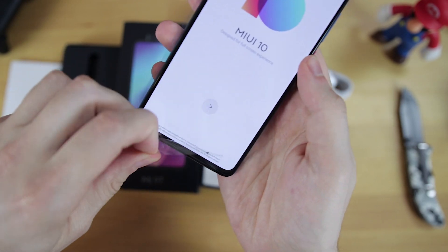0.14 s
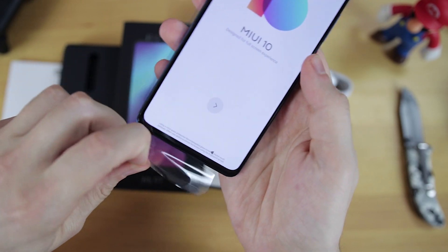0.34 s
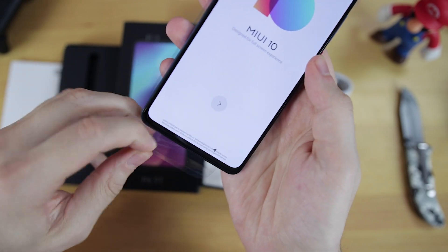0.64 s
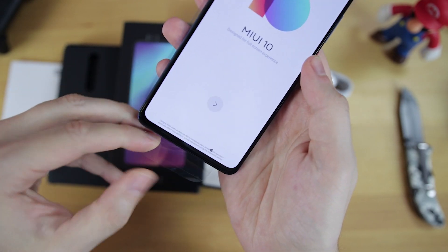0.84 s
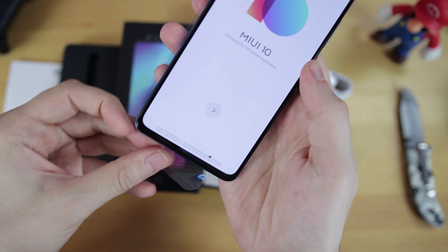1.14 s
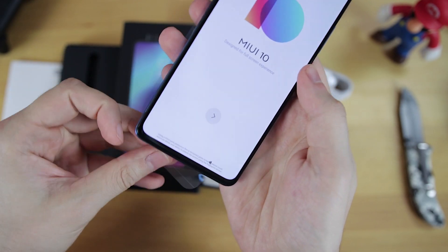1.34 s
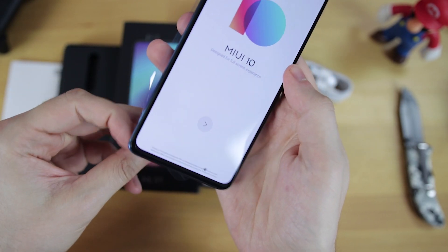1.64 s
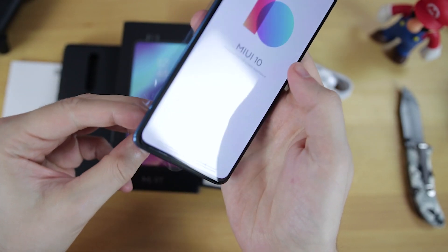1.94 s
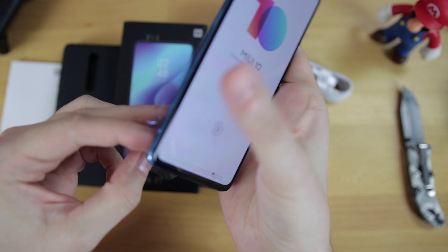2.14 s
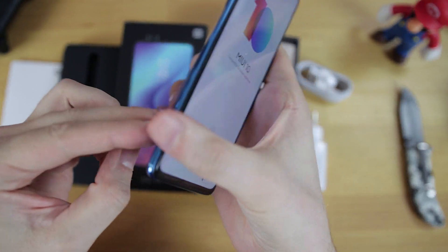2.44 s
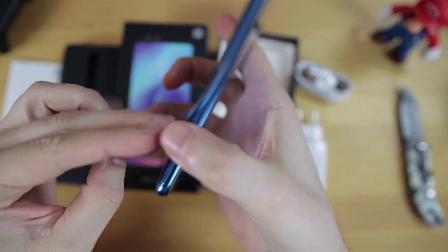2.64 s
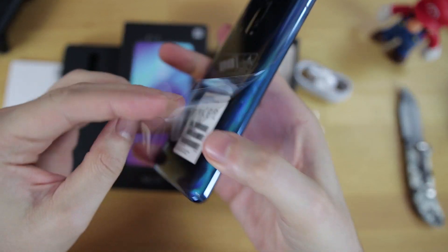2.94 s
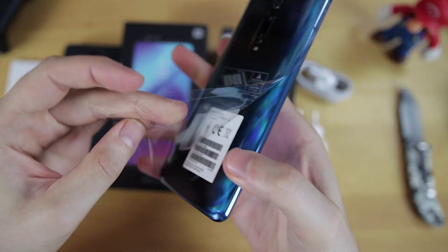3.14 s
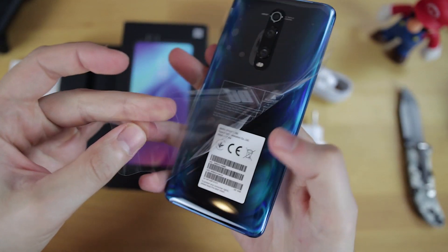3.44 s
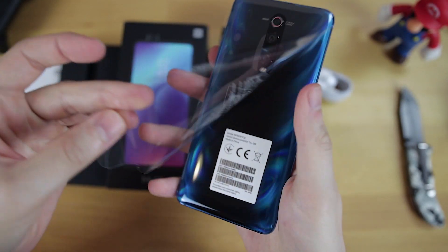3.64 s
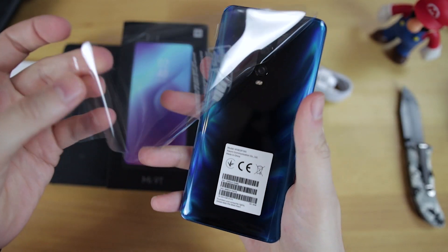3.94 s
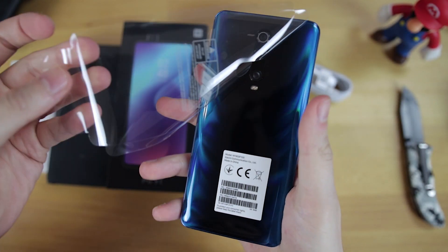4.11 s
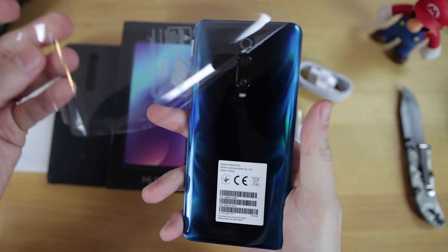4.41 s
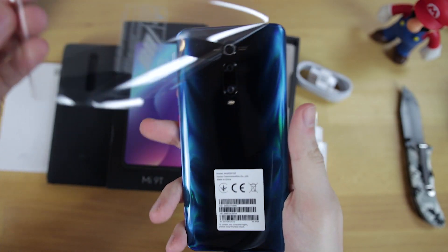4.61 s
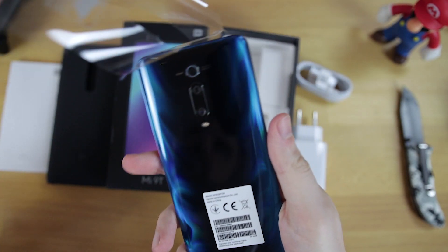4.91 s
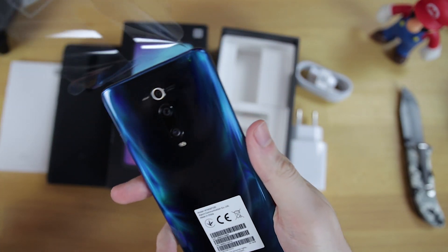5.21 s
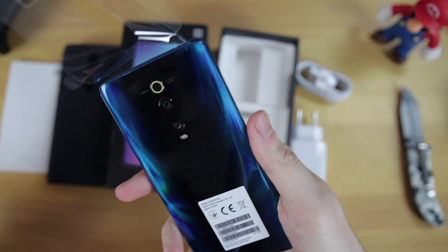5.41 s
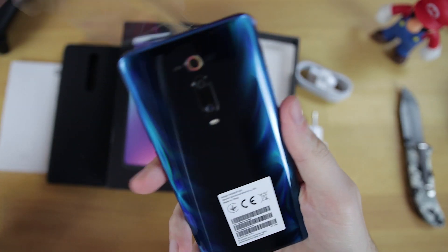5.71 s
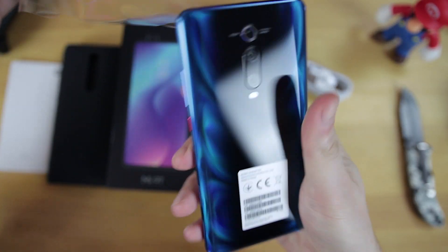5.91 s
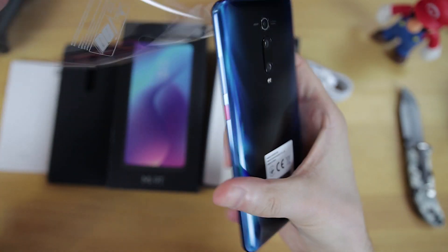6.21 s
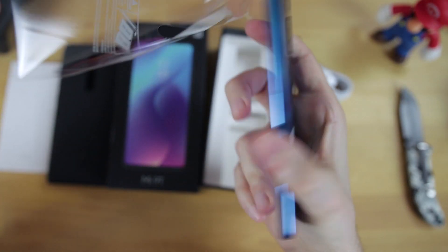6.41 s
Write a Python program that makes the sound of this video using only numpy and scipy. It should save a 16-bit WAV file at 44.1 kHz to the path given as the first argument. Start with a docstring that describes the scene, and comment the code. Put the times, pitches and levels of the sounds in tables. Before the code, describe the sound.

Thin stiff plastic film snaps, ticks and crackles as it is peeled off a phone by hand, close up in a small quiet room.

```python
"""Plastic protective film is peeled off a phone held above a desk in a small room.
Hum, air noise and the faint fizz and ticks of taut film run from the start. From 0.2 s the film snaps as it
buckles, skin rubs the phone and flipped panels ring; from 0.7 s pulls swell the fizz and thicken the ticks.
Finger taps start at 1.4 s, dull bumps at 2.2 s, slides of film on glass at 2.9 s; 5.5-5.9 s is densest in snaps.
Noise bursts, sines and shaped noise make the sources; one wall echo and a room tail follow film and hands."""
import sys
import numpy as np
from scipy import signal
from scipy.fft import rfft, irfft
from scipy.io import wavfile
from scipy.ndimage import uniform_filter1d

SR = 44100
rng = np.random.default_rng(int(sys.argv[2]) if len(sys.argv) > 2 else 0)


def put_to_file(sound):
    """Save the sound as 16-bit audio at rate SR, in the file named by the first command-line argument."""
    columns = np.atleast_2d(sound).T  # one column per channel
    safe = np.clip(columns, -1, 1)
    whole_steps = np.round(safe * 32767)
    wavfile.write(sys.argv[1], SR, whole_steps.astype(np.int16))


N = 289296
TIME_S = np.arange(N) / SR

# room noise: (frequency [Hz], relative level per Hz [dB])
AIR_COLOUR = [(15, -27), (25, -16), (86, -12.5), (122, -8), (148, -12), (169, -14.5), (305, -2.5),
              (340, -7), (457, -10), (552, -13), (598, -10), (848, -14), (919, -19), (3830, -34),
              (15500, -29)]
AIR_RMS_DB = -61.5
# hum partials: (frequency [Hz], rms before the swell [dB])
HUM_PARTIALS = [(59.7, -77), (119.5, -68.5), (179, -71)]
# hum gain: (time [s], gain [dB])
HUM_SWELL = [(0, -3), (4.5, -4.5), (5, -2), (6.56, 3)]

# pulls lifting film off the glass: (start [s], length [s], fizz gain [dB])
PULLS = [(.69, 0.032, -54), (1.74, 0.083, -60.5), (2.27, 0.043, -47), (2.62, 0.075, -49.5),
         (2.94, 0.18, -62), (3.4, 0.04, -57), (3.56, 0.13, -54.5), (3.67, 0.13, -56.5), (4.02, 0.06, -63),
         (5.68, 0.098, -32.5), (5.94, 0.11, -55), (6.1, 0.18, -54), (6.51, 0.054, -50.5)]
HELD_DB = -65.5  # fizz gain of film only held taut
STROKE_ATTACK_S, STROKE_RELEASE_S = 0.013, 0.022  # pulls and slides
# adhesive fizz: (frequency [Hz], relative level per Hz [dB])
PEEL_COLOUR = [(500, -6.5), (1500, -3.5), (3500, -4), (5500, -3.5), (8000, -3.5), (11000, -5.5),
               (15000, -11)]

# centres of the four crack bands, thump to fizz: [Hz]
CRACK_BANDS_HZ = [400, 1400, 4300, 11000]
# colour common to all cracks: (frequency [Hz], gain [dB])
FILM_COLOUR = [(200, -4), (330, -3.5), (500, -1.5), (950, 1), (2800, -3), (4000, -0.5), (5500, -3),
               (8200, 0), (10300, -5), (12800, -0.5), (16000, -9)]
# jumps of the adhesive's edge: (time [s], nominal fizz level [dB], fizz above crack band [dB])
TICKS = [(0.5841, -37.5, 5.5), (1.2965, -33, 15), (1.3597, -41, 14), (1.406, -36.5, 13),
         (1.4296, -38.5, 7.5), (1.445, -43, 7), (1.581, -42.5, 6), (2.2398, -38.5, 17), (2.2958, -45, 4),
         (2.304, -41, 11), (2.314, -44, 10), (3.6372, -35.5, 6), (3.6808, -49, 1), (3.769, -42, 5),
         (3.7822, -48, -1), (3.8153, -36.5, 3.5), (3.8475, -45, 0), (3.8534, -42, 11), (4.0095, -38.5, 2.5),
         (4.077, -48, 2), (4.17, -46, 6), (4.1824, -36.5, 4.5), (4.262, -46, 3.5), (4.4457, -40.5, 4.5),
         (4.5496, -50, 2), (4.5945, -48.5, 2), (4.677, -43, 6), (4.744, -44.5, 13), (4.769, -45.5, 16),
         (4.8264, -31.5, 17), (5.2, -26, 16.5), (5.214, -40, 11), (5.4497, -41.5, 2), (6.036, -48, 10),
         (6.0603, -43.5, 6), (6.072, -46.5, 6)]
TICK_MS, TICK_BODY_DB = 0.55, -15.5  # decay; body against crack band
# small random ticks: level against the pull gain, its spread, fizz above crack band
STRAY_DB, STRAY_SPREAD_DB, STRAY_BRIGHTNESS_DB = 1.5, 4.5, 8
STRAY_TICKS_PER_S, PULL_TICKS_PER_S = 19, 62  # base rate; most a pull can add

# film buckles, nominal energy as rms over 1 ms:
# (time [s], body [dB], crack [dB], fizz [dB], decay [ms])
SNAPS = [(0.2028, -52, -47, -47.5, 4.7), (0.3522, -60, -36, -31, .35), (0.3542, -25.5, -23, -17.5, 1.2),
         (.4379, -29.5, -19.5, -21, 1.14), (.4722, -36, -35, -40, 0.88), (0.8407, -60, -55, -45.5, 3.5),
         (1.0828, -71, -41.5, -43, 2.7), (1.1154, -34.5, -23, -19.5, 1.2), (1.4601, -48.5, -41, -42, 3.6),
         (1.82, -53.5, -50.5, -55, 1.9), (1.8585, -64, -43.5, -51, 1.1), (2.28, -44, -41, -32, 2.5),
         (2.3397, -48, -41, -41, 3.2), (2.349, -43, -34, -37, 1.3), (2.650, -47, -42.5, -31.5, 3.3),
         (2.723, -44, -45, -35, 6.6), (2.728, -27.5, -26, -17.5, 2.9), (3.1252, -40.5, -39.5, -38.5, 3.5),
         (3.4441, -47, -39, -49, 2.2), (3.5314, -40.5, -34.5, -53, 0.57), (3.548, -49, -46, -41.5, 1.9),
         (3.629, -43.5, -45, -40, 3.3), (4.0363, -50, -46, -50, 1), (4.832, -45.5, -31.5, -32, 0.77),
         (4.834, -53, -30.5, -23.5, 0.99), (4.8384, -40, -41, -37, 0.42), (5.5236, -31, -21, -16.5, 1.35),
         (5.6864, -36, -24.5, -13.5, 1.5), (5.7217, -30.5, -18.5, -19.5, 1.1), (5.734, -42, -42, -37, .6),
         (5.7566, -31.5, -15.5, -20.5, 1.1), (5.7675, -38, -20, -26, 1.8), (5.7899, -31.5, -26, -49, 3),
         (5.8465, -36, -40, -45, 2.6), (5.8555, -31.5, -22.5, -19, 1.8), (6.1665, -35.5, -19, -27.5, 1.5)]
THUMP_DB = -1.5  # low end of a snap against its body

# skin rubs on the phone: (centre [s], level [dB], length [s])
RUBS = [(.29, -59.5, 0.012), (2.625, -61, .016), (3.058, -65, .026), (3.392, -63.5, 0.031),
        (3.947, -65.5, .033), (4.292, -71, .12), (4.99, -63.5, 0.016), (5.34, -67.5, 0.13),
        (5.663, -49, .014)]
RUB_HZ, RUB_OCTAVES = 1396, 0.38

# flipped panels: (time [s], pitch [Hz], starting peak before bass cut [dB])
PANELS = [(.354, 390, -34), (.3545, 1065, -31), (0.3547, 1530, -28.5), (0.439, 1170, -32.5),
          (.438, 2164, -21), (.438, 3580, -28), (1.114, 515, -26), (1.114, 630, -24), (1.118, 3600, -33.5),
          (2.347, 2440, -35.5), (2.728, 337, -38.5), (2.727, 1035, -35), (2.728, 1640, -31),
          (2.726, 4700, -28), (3.403, 507, -39.5), (3.403, 638, -40.5), (5.5243, 5930, -19.5),
          (5.686, 6500, -10.5), (5.7221, 1240, -23.5), (5.7675, 210, -35), (5.856, 327, -32.5),
          (5.856, 3280, -23.5), (6.1683, 860, -37.5), (6.1672, 3930, -28.5)]
PANEL_T60_S, PANEL_REFERENCE_HZ, PANEL_DAMPING_POWER = 0.027, 1000, 0.73  # high panels die sooner
LINGER_DB, LINGER_T60_S, LINGER_OCTAVES = -12.5, 0.46, 0.12  # energy against ring, decay, bandwidth

# finger knocks: (time [s], nominal level [dB], corner above which the treble falls [Hz])
TAPS = [(1.4192, -36, 1090), (1.871, -45.5, 3000), (2.0303, -39.5, 4330), (2.0498, -43.5, 3300),
        (2.669, -31.5, 600), (2.6747, -42, 1400), (3.404, -39.5, 1910), (5.6537, -36.5, 700),
        (5.978, -37.5, 1200), (6.073, -35.5, 412)]
TAP_MS, TAP_FALL_DB_PER_OCTAVE = 1.6, 13

# bumps as the phone shifts in the hand: (centre [s], level [dB], length [s])
BUMPS = [(2.22, -61.5, 0.25), (2.735, -48, 0.018), (5.778, -49, 0.032)]
BUMP_HZ, BUMP_OCTAVES = 121, 1.3

# film sliding flat over glass: (start [s], length [s], rms level [dB])
SLIDES = [(2.91, 0.18, -67), (3.1, 0.39, -71.5), (3.59, 0.09, -65), (6.01, 0.12, -61.5),
          (6.185, 0.028, -49.5)]
# slide hiss: (frequency [Hz], relative level per Hz [dB])
SLIDE_COLOUR = [(2000, -32), (5500, -30), (8000, 2), (10000, -7), (13000, 2.5), (15500, -12)]

WALL_S, WALL_DB, WALL_SPREAD_S = 0.0112, -15.5, 0.0025
# room tail: (frequency [Hz], energy against direct sound [dB], t60 [s])
ROOM_TAIL = [(150, -9.5, 0.83), (510, -6, 0.54), (1220, -5, 0.48), (2210, -4.5, 0.41), (4500, -9, 0.44),
             (7750, -9, 0.42), (15400, -10, 0.3)]
EDGES_HZ = np.geomspace(110, 17600, 25)
CENTRES_HZ = np.sqrt(EDGES_HZ[1:] * EDGES_HZ[:-1])

# faint side signal, 90 degrees off the mid: (frequency [Hz], side against mid [dB])
SIDE_LEVEL = [(35, -28), (250, -44), (2000, -45), (4500, -37), (8500, -28), (15000, -35)]
CUTOFF_HZ = 16300


def from_db(db):
    """Decibels to gain."""
    return 10 ** (np.asarray(db) / 20)


def unit_energy(x):
    """Each row scaled to a sum of squares of one."""
    return x / np.sqrt(np.sum(x ** 2, axis=-1, keepdims=True) + 1e-30)


def at_hz(points, hz, column=1):
    """Read a table on a log-frequency axis."""
    points = np.array(points)
    return np.interp(np.log(hz), np.log(points[:, 0]), points[:, column])


def band(x, low_hz, high_hz):
    """Causal band-pass."""
    return signal.sosfilt(signal.butter(2, [low_hz, high_hz], "band", fs=SR, output="sos"), x)


def octave_band(x, hz, octaves):
    """Band-pass of a given width around a frequency."""
    half_width = 2 ** (octaves / 2)
    return band(x, hz / half_width, hz * half_width)


def coloured(x, spectrum):
    """A steady signal given a spectrum; rms 1."""
    hz = np.maximum(np.fft.rfftfreq(N, 1 / SR), 1)
    shaped = irfft(rfft(x) * from_db(at_hz(spectrum, hz)), N)
    return unit_energy(shaped) * np.sqrt(N)


def add(track, time_s, sound):
    """Mix a sound in at a time."""
    at = int(round(time_s * SR))
    track[at:at + len(sound)] += sound[:max(N - at, 0)]


def background():
    """Steady room noise and hiss under a slowly swelling low hum."""
    hum = np.zeros(N)
    for hz, rms_db in HUM_PARTIALS:
        hum += from_db(rms_db) * np.sqrt(2) * np.sin(2 * np.pi * (hz * TIME_S + rng.random()))
    swell = from_db(np.interp(TIME_S, *np.transpose(HUM_SWELL)))
    air = from_db(AIR_RMS_DB) * coloured(rng.standard_normal(N), AIR_COLOUR)
    return hum * swell + air


def strokes(rows):
    """Gain of hand strokes: each rises, holds and dies away."""
    gain = np.zeros(N)
    for start_s, length_s, db in rows:
        rise = np.clip((TIME_S - start_s) / STROKE_ATTACK_S, 0, 1)
        fall = np.exp(-np.clip((TIME_S - start_s - length_s) / STROKE_RELEASE_S, 0, 20))
        gain += from_db(db) * rise * fall
    return gain


def pulling():
    """How hard the adhesive is worked, as the gain of its fizz."""
    return np.hypot(from_db(HELD_DB), strokes(PULLS))


def peel(per_s=450, spread_db=5.0, grain_gain=0.31, hiss_gain=0.3, grain_s=0.00093):
    """Tiny patches of adhesion let go one by one, over the smooth hiss of sliding."""
    sizes = from_db(spread_db * np.minimum(rng.exponential(1, N), 3))
    releases = (rng.random(N) < per_s / SR) * sizes
    decay = np.exp(-1 / (grain_s * SR))
    envelope = signal.lfilter([1], [1, -decay], releases + 1e-18)
    grains = coloured(envelope * rng.standard_normal(N), PEEL_COLOUR)
    hiss = coloured(rng.standard_normal(N), PEEL_COLOUR)
    return (grain_gain * grains + hiss_gain * hiss) * pulling()


def minimum_phase(gain):
    """The spectrum with these magnitudes whose sound starts at once."""
    cepstrum = irfft(np.log(gain))
    half = len(cepstrum) // 2
    cepstrum[1:half] *= 2
    cepstrum[half + 1:] = 0
    return np.exp(rfft(cepstrum))


def crack(levels_db, decay_ms, desk_db=-11, desk_ms=4.9, desk_hz=3500,
          bass_cut_hz=230, trim_db=0.37, smooth_hz=700):
    """A dense, brief rattle of slips; phone, hands and desk scatter it longer and duller."""
    size = 2048
    ms = np.arange(size) / SR * 1000
    hz = np.maximum(np.fft.rfftfreq(size, 1 / SR), 20)
    slips, scatter = rng.standard_normal((2, size))
    direct = slips * np.exp(-ms / decay_ms)
    scattered = from_db(desk_db) * scatter * np.exp(-ms / desk_ms)
    scattered = signal.lfilter(*signal.butter(1, desk_hz, fs=SR), scattered)
    burst = rfft(direct + scattered)
    # slips set the fine grain; size and tension of the fold set the broad colour
    broad = np.sqrt(uniform_filter1d(np.abs(burst) ** 2, int(smooth_hz * size / SR)))
    widths_db = 10 * np.log10([650, 1700, 4500, 9000])  # band widths in Hz: band level to level per Hz
    per_hz = SR / np.sqrt(2000)
    fold = from_db(np.interp(np.log(hz), np.log(CRACK_BANDS_HZ), np.array(levels_db) - widths_db))
    colour = from_db(trim_db + at_hz(FILM_COLOUR, hz)) / np.sqrt(1 + (bass_cut_hz / hz) ** 4)
    return irfft(burst * minimum_phase(per_hz * fold * colour / broad))


def tick(level_db, brightness_db):
    """A very short crack with almost no body."""
    crack_db = level_db - brightness_db
    body_db = crack_db + TICK_BODY_DB
    return crack([body_db, body_db, crack_db, level_db], TICK_MS)


def ticks(count=12):
    """Clear jumps of the adhesive's edge, and small random ones, denser and stronger with each pull."""
    out = np.zeros(N)
    for time_s, level_db, brightness_db in TICKS:
        add(out, time_s, tick(level_db, brightness_db))
    shapes = [tick(STRAY_DB, STRAY_BRIGHTNESS_DB) for _ in range(count)]
    effort = pulling()
    sizes = effort * from_db(STRAY_SPREAD_DB * rng.standard_normal(N))
    per_s = STRAY_TICKS_PER_S + PULL_TICKS_PER_S * (1 - from_db(HELD_DB) / effort)
    for at in np.flatnonzero(rng.random(N) < per_s / SR):
        add(out, at / SR, sizes[at] * shapes[at % count])
    return out


def snaps():
    """Each buckle of the film is one crack, coloured by the size of its fold."""
    out = np.zeros(N)
    for time_s, body_db, crack_db, fizz_db, decay_ms in SNAPS:
        add(out, time_s, crack([body_db + THUMP_DB, body_db, crack_db, fizz_db], decay_ms))
    return out


def swells(rows, hz, octaves):
    """Short bell-shaped swells of noise in one broad resonance."""
    noise = unit_energy(octave_band(rng.standard_normal(N), hz, octaves)) * np.sqrt(N)
    gain = np.zeros(N)
    for centre_s, db, length_s in rows:
        gain += from_db(db) * np.exp(-2 * np.minimum(((TIME_S - centre_s) / length_s) ** 2, 20))
    return noise * gain


def rubs():
    """Skin friction on the phone: swells of mid-band noise."""
    return swells(RUBS, RUB_HZ, RUB_OCTAVES)


def panels(bass_cut_hz=200):
    """A flipped panel rings at its pitch, then lingers in close modes; it radiates no deep bass."""
    out, t = np.zeros(N), TIME_S[:SR // 2]
    for time_s, hz, peak_db in PANELS:
        t60_s = PANEL_T60_S * (PANEL_REFERENCE_HZ / hz) ** PANEL_DAMPING_POWER
        ring = from_db(peak_db - 60 * t / t60_s) * np.sin(2 * np.pi * hz * t)
        cluster = octave_band(rng.standard_normal(len(t)), hz, LINGER_OCTAVES)
        cluster = unit_energy(cluster * from_db(-60 * t / LINGER_T60_S))
        add(out, time_s, ring + from_db(LINGER_DB) * np.linalg.norm(ring) * cluster)
    return signal.sosfilt(signal.butter(4, bass_cut_hz, "high", fs=SR, output="sos"), out + 1e-18)


def taps():
    """A fingertip is soft, so its knock loses the treble."""
    out = np.zeros(N)
    for time_s, level_db, corner_hz in TAPS:
        octaves_above = np.maximum(np.log2(np.array(CRACK_BANDS_HZ) / corner_hz), 0)
        add(out, time_s, crack(level_db - TAP_FALL_DB_PER_OCTAVE * octaves_above, TAP_MS))
    return out


def bumps():
    """The phone shifts in the hand: swells of low noise."""
    return swells(BUMPS, BUMP_HZ, BUMP_OCTAVES)


def slide():
    """Smooth friction of film on glass: a high hiss."""
    return coloured(rng.standard_normal(N), SLIDE_COLOUR) * strokes(SLIDES)


def wall(x):
    """A smeared echo off the nearest wall."""
    t = TIME_S[:SR // 20]
    smear = (t > WALL_S) * np.exp(-np.abs(t - WALL_S) / WALL_SPREAD_S / 2)
    echo = unit_energy(rng.standard_normal(len(t)) * smear)
    return from_db(WALL_DB) * signal.fftconvolve(x, echo)[:N]


def room(x, build_s=0.007, scattered_share=0.78):
    """Fixed room modes plus diffuse energy from the moving film; both drain band by band."""
    t = TIME_S[:int(0.7 * SR)]
    build = 1 - np.exp(-(t / build_s) ** 4)
    late = np.interp(TIME_S - build_s, TIME_S, x, left=0)
    white = rng.standard_normal((2, N))
    modes, diffuse = np.zeros(len(t)), np.zeros(N)
    for k, (low, high, hz) in enumerate(zip(EDGES_HZ, EDGES_HZ[1:], CENTRES_HZ)):
        gain, t60_s = from_db(at_hz(ROOM_TAIL, hz)), at_hz(ROOM_TAIL, hz, column=2)
        noise = unit_energy(band(white[k % 2], low, high))  # neighbours use different noise
        tail = unit_energy(noise[-len(t):] * from_db(-60 * t / t60_s) * build)
        modes += gain * tail * np.sqrt(2 * (high - low) / SR)
        keep = from_db(-120 / (t60_s * SR))  # power kept per sample
        power = signal.lfilter([1 - keep], [1, -keep], band(late, low, high) ** 2)
        diffuse += gain * noise * np.sqrt(N * power)
    fixed = signal.fftconvolve(x, modes)[:N]
    return np.sqrt(1 - scattered_share) * fixed + np.sqrt(scattered_share) * diffuse


def scene():
    """Film and hands close to the microphone, the room behind them."""
    film = peel() + ticks() + snaps() + panels() + slide()
    hands = rubs() + taps() + bumps()
    near = film + hands
    return np.tile(near + wall(near) + room(near) + background(), (2, 1))


def record(dry, channel_hiss_db=-104):
    """Near-mono sound with a faint side signal and slight hiss in each channel; the top is cut steeply."""
    hz = np.maximum(np.fft.rfftfreq(N, 1 / SR), 1)
    side = irfft(1j * rfft(dry[0]) * from_db(at_hz(SIDE_LEVEL, hz)), N)  # 90 degrees off the mid
    hiss = from_db(channel_hiss_db) * rng.standard_normal((2, N))
    both = dry + side * np.array([[1], [-1]]) + hiss
    return signal.sosfilt(signal.ellip(10, 0.2, 70, CUTOFF_HZ, fs=SR, output="sos"), both)


dry = scene()
out = record(dry)
put_to_file(out)
```